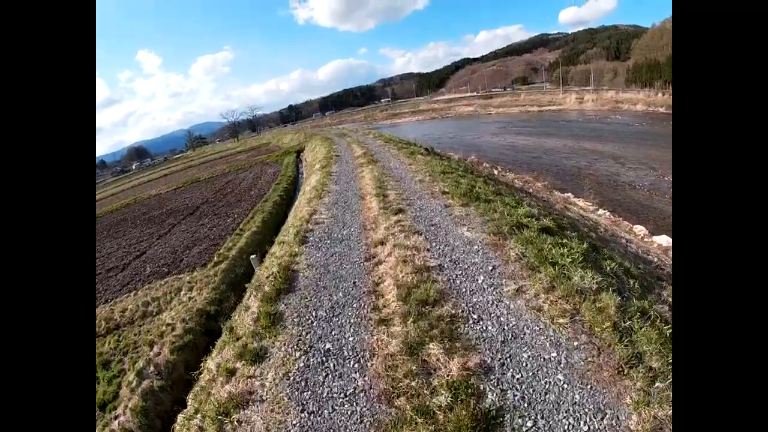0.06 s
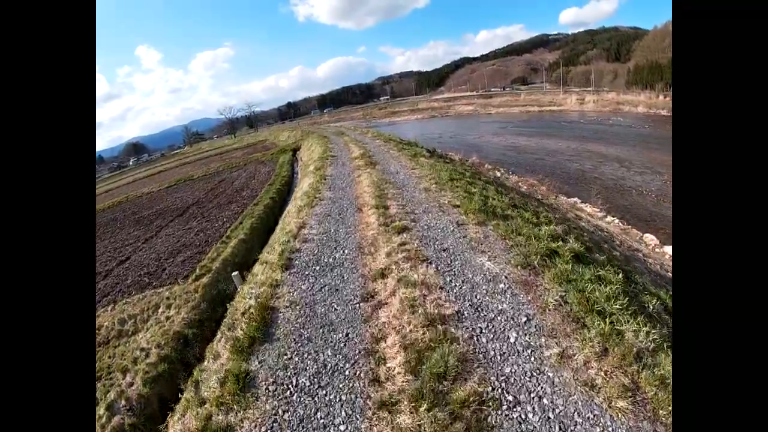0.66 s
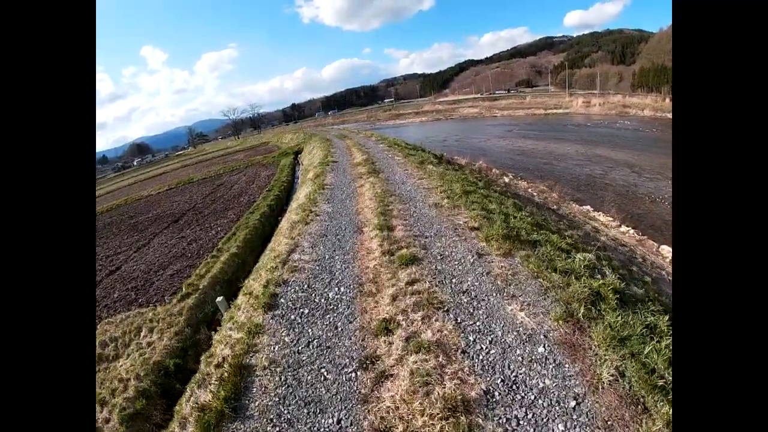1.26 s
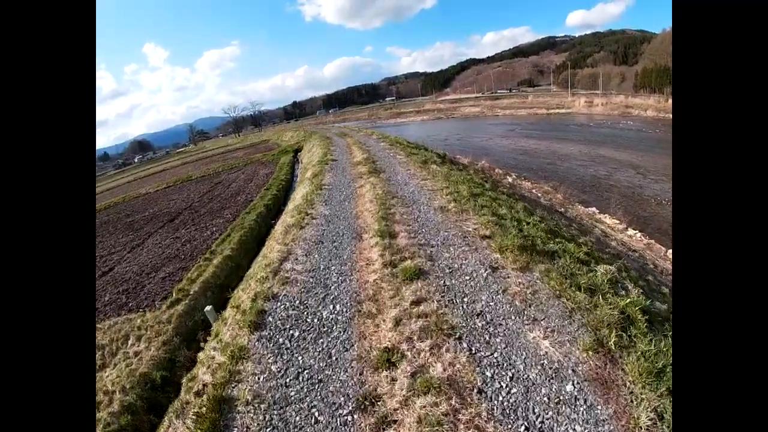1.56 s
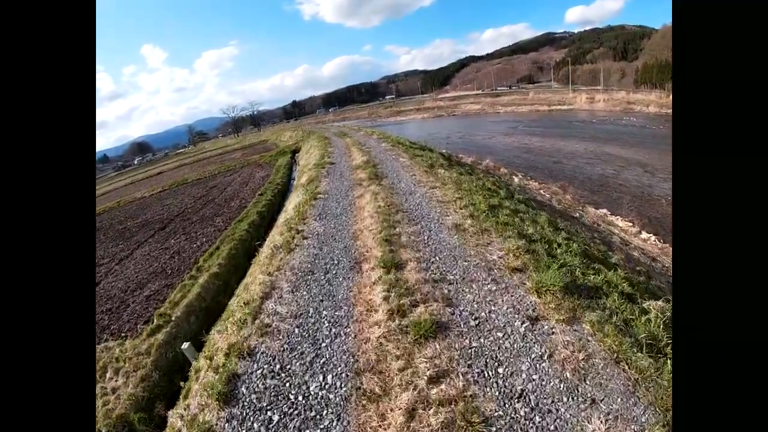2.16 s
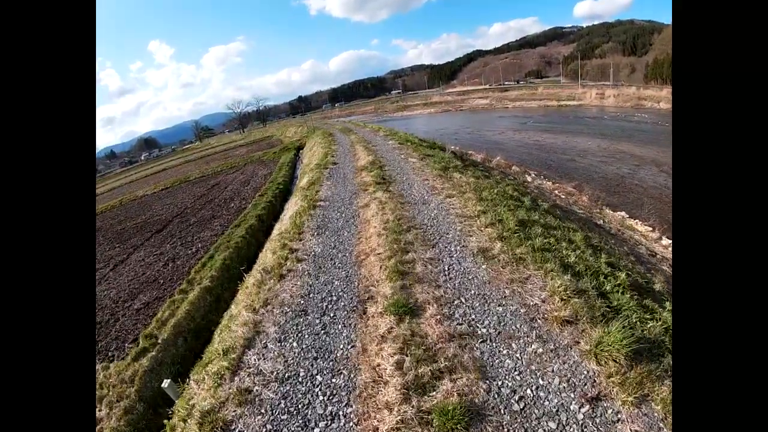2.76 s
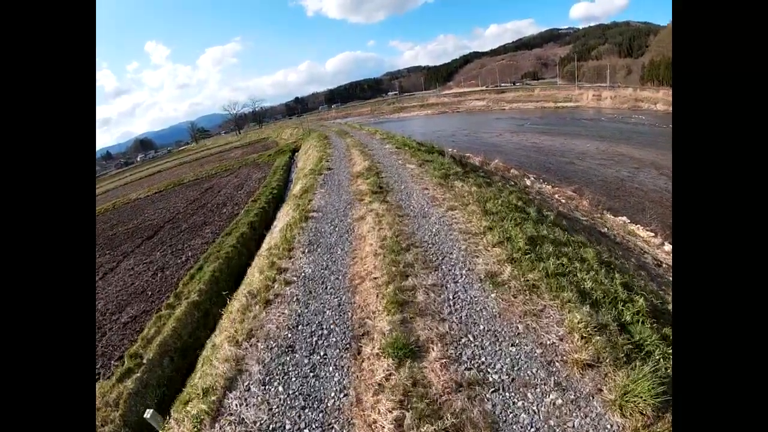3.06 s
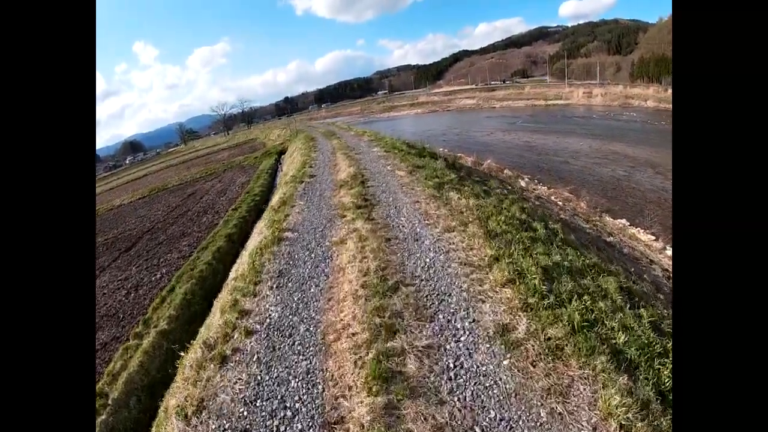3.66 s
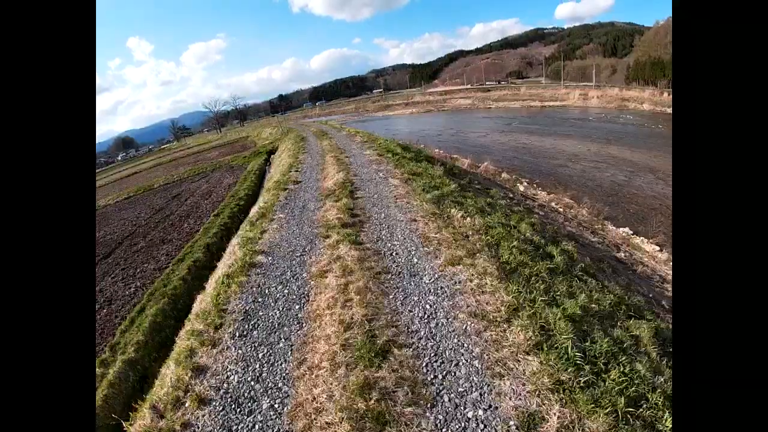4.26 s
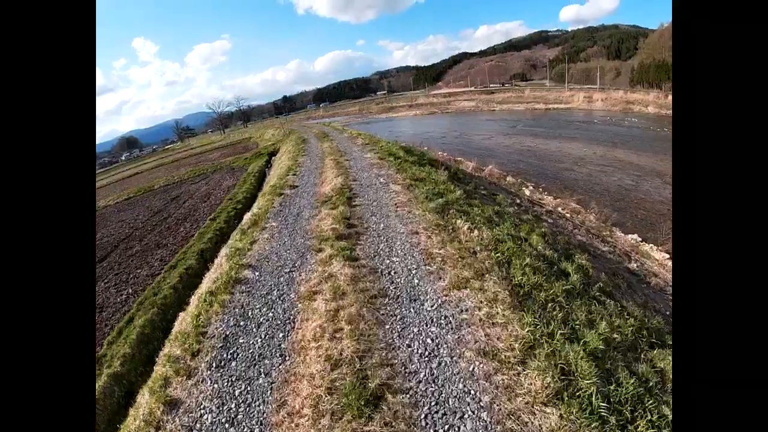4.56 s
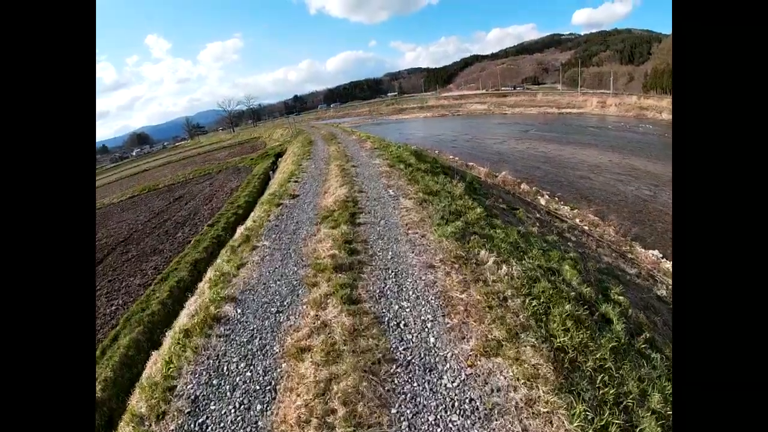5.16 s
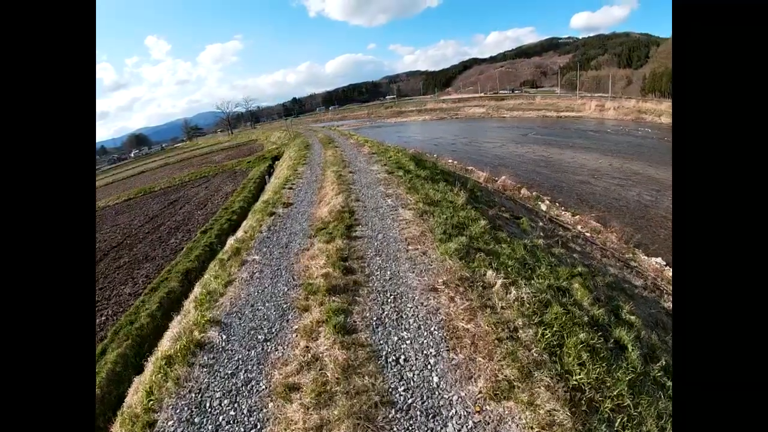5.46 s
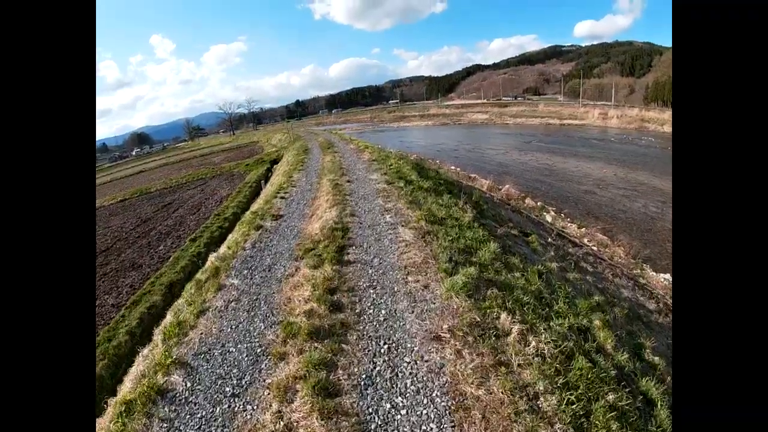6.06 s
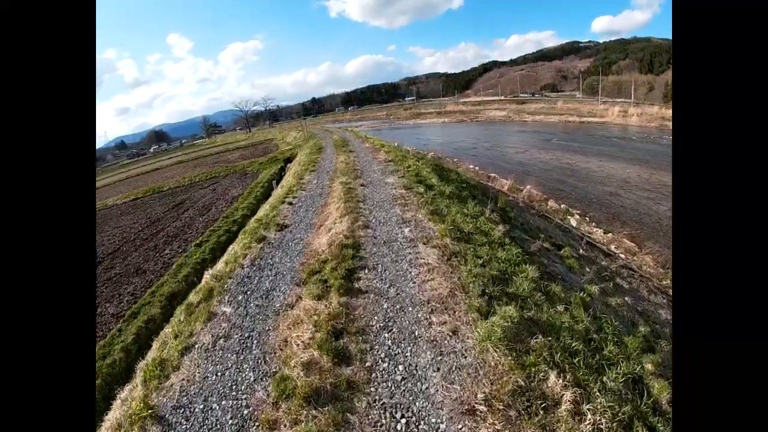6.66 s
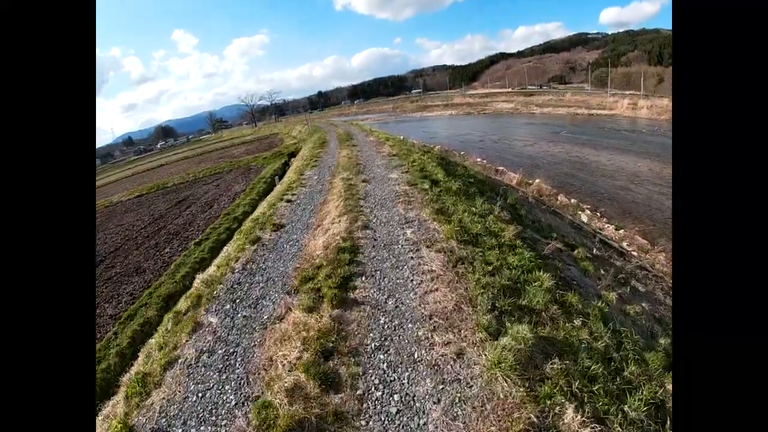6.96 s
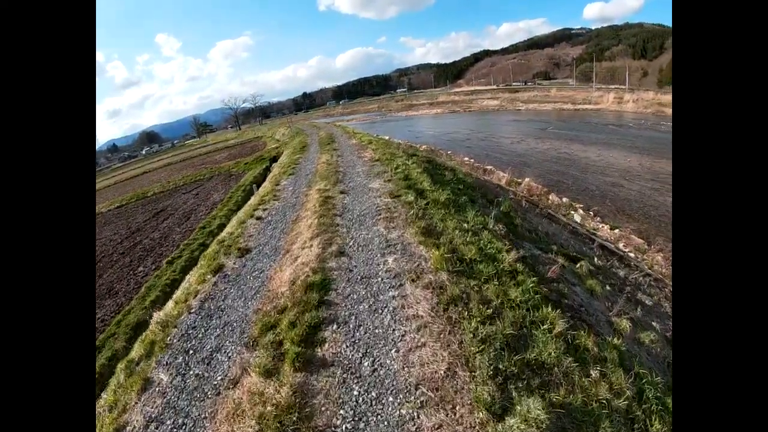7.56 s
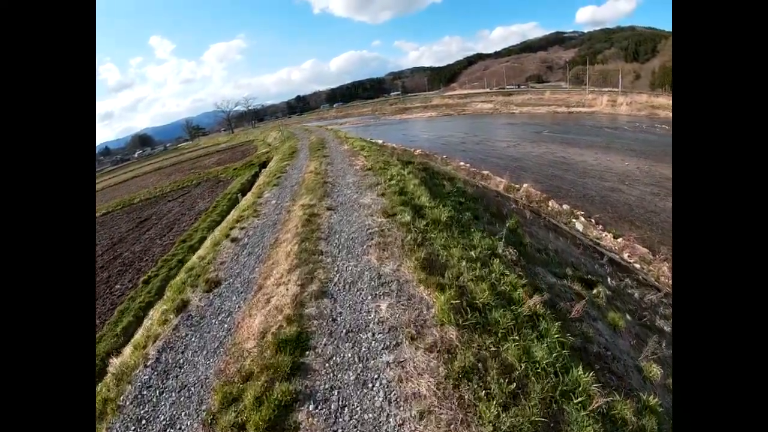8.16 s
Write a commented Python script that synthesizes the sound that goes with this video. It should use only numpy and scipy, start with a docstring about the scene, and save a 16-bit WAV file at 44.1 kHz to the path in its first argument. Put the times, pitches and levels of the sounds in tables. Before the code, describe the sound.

Wind buffets the microphone over a steady rush of air, with faint footsteps crunching on gravel underneath.

```python
"""Wind buffets a small hand-held microphone, hardest in the first second, over a steady rush of air.
Under it, someone walks a gravel track between open fields: sandy scuffs, then soft crunches about
every 0.6 s that fade. Eddies heave the diaphragm; the wind puffs, and hums low once near 6.2 s.
Each sole grinds many tiny stones; larger ones scrape and squeak, and single pebbles click."""
import sys
import numpy as np
from scipy.fft import rfft, irfft, next_fast_len
from scipy.io import wavfile
from scipy.ndimage import uniform_filter1d, map_coordinates

SR = 44100
rng = np.random.default_rng(int(sys.argv[2]) if len(sys.argv) > 2 else 0)


def log_audio(samples):
    """Write samples as a 16-bit WAV file to the path given in sys.argv[1]."""
    # one column per channel
    frames = np.atleast_2d(samples).T
    # limit to full scale, then quantise
    limited = np.clip(frames, -1, 1)
    pcm = np.round(limited * 32767).astype(np.int16)
    wavfile.write(sys.argv[1], SR, pcm)


N = 370881

# footfalls on gravel: landing_s, roll_s, relative_level_db, heel_to_toe_growth_db, fine_grit_lift_db
FOOTFALLS = [(1.171, .14, -77, 1.5, 0), (1.677, 0.24, -72.5, 3.5, 5.5), (2.3, .18, -70, -2, 5),
             (2.86, .2, -72, 2, -3), (3.39, .24, -74, 3, 3), (4.106, .14, -72, 3.5, 5.5),
             (4.722, .036, -77, -1, 3), (5.156, .22, -82, 0, -3), (5.862, .023, -84, 0, -1),
             (6.605, .045, -79.5, 0, -4), (7.205, .07, -78.5, 1, -2), (7.892, .08, -83, -6, 2),
             (8.215, .24, -88, 3, 0)]
# the rush of open air: time_s, relative_level_db, low_body_lift_db
OPEN_AIR = [(0, -52, -1), (.2, -53, -5), (.65, -56, 0.5), (.95, -60, 3.5), (1.15, -58.5, 6.5),
            (1.35, -54, 2.5), (1.8, -51, 4), (2.2, -49.5, -10.5), (2.5, -50, -1), (2.85, -49, -16),
            (3.25, -50, -5), (3.5, -49.5, -1.5), (4.05, -49.5, -7), (4.3, -49.5, -.5), (4.75, -49.5, -1.5),
            (5.7, -50, 0.5), (6.55, -48, -1), (7, -49, -2), (7.7, -48, 0), (8.41, -47.5, -3)]


def amp(db):
    """Decibels to gain."""
    return 10 ** (np.asarray(db) / 20)


def unit(x):
    """x at rms 1."""
    return x / np.sqrt(np.mean(x ** 2) + 1e-20)


def clock():
    """The time of each sample in seconds."""
    return np.arange(N) / SR


def bell(t, peak_s, half_s):
    """A Gaussian swell of height 1; its half length is one standard deviation."""
    return np.exp(-.5 * ((t - peak_s) / half_s) ** 2)


def curves(rows):
    """One value per sample for each column after the time."""
    times, *columns = np.transpose(rows)
    return [np.interp(clock(), times, column) for column in columns]


def wobble(rate):
    """A smooth random curve, rate knots a second."""
    return map_coordinates(rng.standard_normal(int(N * rate / SR) + 4), [clock() * rate])


def filtered(x, response):
    """x through a gain that depends on frequency."""
    size = next_fast_len(N + 8192)
    return irfft(rfft(x, size) * response(np.fft.rfftfreq(size, 1 / SR)), size)[:N]


def coloured(x, spectrum):
    """x through an EQ curve of (frequency_hz, gain_db) points, at rms 1."""
    points_hz, db = np.transpose(spectrum)
    return unit(filtered(x, lambda hz: amp(np.interp(np.log(hz + 1), np.log(points_hz), db))))


def eddies(spectrum, span_s):
    """Turbulent pressure whose strength is evened out over span_s."""
    pressure = coloured(rng.standard_normal(N), spectrum)
    width = max(int(span_s * SR), 64)
    power = uniform_filter1d(uniform_filter1d(pressure ** 2, width), width)
    return unit(pressure / np.sqrt(np.abs(power) + .02))


def grains(per_second, spread_db):
    """Tiny contacts at random moments, a few larger than the rest."""
    hits = rng.random(N) < per_second / SR
    size = np.minimum(rng.exponential(size=N), 3)
    return unit(hits * rng.choice([-1, 1], N) * amp(spread_db * size))


def burst(source, peak_s, db, half_s, centre_hz, sharpness):
    """One swell of a source through a steep-sided resonance."""
    size = next_fast_len(int(8 * max(half_s, .002) * SR) + 2048)
    start = int(np.clip(round(peak_s * SR) - size // 2, 0, N - size))
    hz = np.fft.rfftfreq(size, 1 / SR) + 1
    band = 1 / (1 + (sharpness * (hz / centre_hz - centre_hz / hz)) ** 2 / 2) ** 2
    puff = unit(irfft(rfft(source[start:start + size]) * band, size))
    swell = bell((start + np.arange(size)) / SR, peak_s, half_s)
    return np.pad(amp(db) * swell * puff, (start, N - size - start))


def buffeting():
    """Large eddies heave the diaphragm, smaller ones flutter on top, and single ones thump the port."""
    # strength of the wind on the port: time_s, relative_level_db
    wind_strength = [(0, -24), (.25, -28.5), (.35, -27.5), (.52, -21.5), (.8, -27), (.92, -32.5),
                     (1.35, -30.5), (1.85, -32.5), (2.03, -26), (2.42, -23.5), (2.63, -30.5), (3.25, -34),
                     (4.6, -32.5), (5.3, -33), (5.88, -37.5), (6.65, -36), (7.1, -38), (7.95, -34),
                     (8.41, -42.5)]
    # the wind drops away: time_s, half_length_s, depth_db
    lulls = [(1.066, 0.023, 6.5), (1.277, 0.051, 6.5), (2.67, 0.013, 2.5), (3.246, 0.032, 1),
             (3.608, .02, 0.5), (5.043, 0.017, 8), (5.496, 0.031, 3), (5.724, 0.043, 3.5),
             (5.936, 0.026, 3), (6.133, 0.042, 7.5), (6.37, 0.032, 3), (6.865, 0.057, 4.5),
             (7.325, 0.035, 3.5), (7.65, 0.044, 3.5), (8.34, .04, 5)]
    # single eddies: peak_s, half_length_s, heave_db, flutter_db, fine_share (0-1)
    buffets = [(0.091, 0.018, -37, -22.5, 0.24), (0.18, 0.026, -24.5, -16.5, 0.35),
               (0.239, 0.027, -18, -22.5, 0.42), (0.565, 0.024, -26, -15, 0.11),
               (0.675, 0.031, -21.5, -19, 0.21), (0.778, 0.021, -13.5, -17, 0.63),
               (0.84, 0.013, -32, -18.5, 0.48), (1.003, 0.016, -24.5, -33, 0.08),
               (1.115, 0.025, -42, -32, 0.18), (1.178, 0.018, -28, -28, 0.1), (2.03, 0.031, -24, -30, 0.77),
               (2.224, .019, -23, -30, 0.5), (2.356, 0.032, -28, -32.5, 0.74), (2.45, 0.016, -25, -21, 1),
               (2.745, .019, -40, -29.5, 0.26), (2.796, 0.012, -23, -43, .2),
               (2.939, 0.017, -31, -33, 0.95), (3.051, 0.024, -23, -53, .2), (3.474, 0.047, -25, -43, 0.15),
               (3.675, 0.016, -24, -32.5, 0.4), (3.799, 0.017, -20, -27, .35), (3.86, 0.017, -20, -30, .2),
               (3.913, .012, -24, -37, 0.07), (4.037, 0.019, -23, -45, .2), (4.122, 0.019, -23.5, -39, .2),
               (4.235, 0.02, -23.5, -40, 0), (4.397, .022, -24.5, -49, .2), (4.59, 0.014, -25.5, -44, .2),
               (4.83, 0.016, -30, -54, 0.05), (5.107, 0.012, -27, -34, 0.24), (5.16, 0.013, -34, -33, 0.8),
               (5.217, 0.011, -31, -35.5, .6), (5.31, 0.0073, -23.5, -51, .1),
               (6.451, 0.011, -39, -30, 0.92), (6.757, 0.02, -32.5, -34, 0.72),
               (6.981, 0.016, -21, -31, 0.87), (7.214, 0.02, -29, -43, .3), (7.585, 0.013, -46, -36.5, 1),
               (7.811, 0.0086, -31, -31, 0.3), (8.24, 0.023, -32, -39, 0.7)]
    # deep rumble of the large eddies: frequency_hz, gain_db
    heave_eq = [(10, -10), (22, 4.5), (45, 4.5), (80, 0.5), (115, -7), (160, -19), (300, -57.5),
                (800, -79.5), (16000, -130)]
    # flutter of the smaller eddies: frequency_hz, gain_db
    flutter_eq = [(60, -9.5), (110, -5.5), (150, 2.5), (205, -6), (280, -15.5), (450, -29.5), (900, -58),
                  (3000, -83), (16000, -120)]
    t = clock()
    dips_db = sum(depth_db * bell(t, s, half_s) for s, half_s, depth_db in lulls)
    wind_db = curves(wind_strength)[0] + 1.36 * wobble(12) - dips_db
    heave_power = amp(wind_db + 1 + 1.2 * wobble(22)) ** 2
    flutter_gain = amp(wind_db - 9.5 + 3.73 * wobble(24))
    flutter_gain *= amp(-2.5 * np.maximum(wobble(9), 0))  # it dips between eddies
    coarse_power, fine_power = np.zeros((2, N))
    for s, half_s, heave_db, flutter_db, fine_share in buffets:
        near = slice(max(int((s - 4 * half_s) * SR), 0), int((s + 4 * half_s) * SR))
        swell = bell(t[near], s, half_s) ** 2
        heave_power[near] += amp(heave_db) ** 2 * swell
        coarse_power[near] += (1 - fine_share) * amp(flutter_db) ** 2 * swell
        fine_power[near] += fine_share * amp(flutter_db) ** 2 * swell
    thumps = np.zeros(N)
    for power, pitch_ratio in [(coarse_power, .77), (fine_power, 1.112)]:  # larger eddies sound lower
        thump_eq = [(hz * pitch_ratio, db) for hz, db in flutter_eq]
        thumps += np.sqrt(power) * eddies(thump_eq, span_s=.028)
    heave = np.sqrt(heave_power) * eddies(heave_eq, span_s=.1)
    flutter = flutter_gain * eddies(flutter_eq, span_s=.047)
    return heave + flutter + thumps


def wind_puffs_and_hum():
    """Short dull puffs of wind, and one long low wind hum near 6.2 s: swells of ragged noise."""
    # the puffs and the hum: peak_s, level_db, half_length_s, centre_hz
    swells = [(0.179, -36.5, 0.026, 378), (0.204, -31.5, 0.0027, 517), (0.253, -34, 0.017, 407),
              (0.51, -38.5, 0.016, 375), (0.56, -38, .003, 470), (0.576, -30, 0.013, 370),
              (0.692, -38.5, 0.068, 350), (0.776, -35.5, 0.0038, 680), (0.788, -22, 0.0063, 360),
              (0.826, -38, 0.014, 423), (1.641, -37, 0.012, 453), (1.704, -44, 0.016, 380),
              (1.89, -39.5, 0.023, 480), (2.017, -35.5, 0.021, 388), (2.048, -33, 0.0054, 616),
              (2.076, -40.5, 0.025, 624), (2.125, -45, .004, 620), (2.43, -41, 0.019, 470),
              (2.477, -35.5, 0.018, 706), (2.518, -43, 0.007, 620), (2.643, -44, .014, 680),
              (2.711, -39, 0.022, 645), (2.767, -44.5, 0.017, 580), (3.443, -45, 0.025, 500),
              (6.198, -45, 0.3, 180)]
    dull_eq = [(200, 3), (400, .5), (750, -9), (1200, -14), (2500, -13.5)]
    ragged = amp(1.8 * wobble(120))
    flow = ragged * coloured(rng.standard_normal(N), dull_eq)
    return sum(burst(flow, *swell, sharpness=1.05) for swell in swells)


def tread():
    """Relative level in dB of the grit underfoot: each step lands, rolls, lifts and leaves a trickle."""
    land_db_per_s, lift_db_per_s = 231.5, 189
    trickle_db, trickle_db_per_s = -9.5, 45.5
    t = clock()
    level = amp(-87.5)  # gravel settling between steps
    for s, roll_s, db, growth_db, _ in FOOTFALLS:
        attack_db = -land_db_per_s * np.maximum(s - t, 0)
        push_db = growth_db * (np.clip((t - s) / roll_s, 0, 1) - .5)
        lifted_s = np.maximum(t - s - roll_s, 0)
        release_db = np.maximum(-lift_db_per_s * lifted_s, trickle_db - trickle_db_per_s * lifted_s)
        level = np.hypot(level, amp(db + attack_db + push_db + release_db))
    return 20 * np.log10(level)


def footsteps():
    """Weight rolls over the sole and crunches small stones in clumps; under a firm step a few snap."""
    # crunch of gravel: frequency_hz, gain_db
    gravel_eq = [(900, -5.5), (2800, 13), (4700, 4), (5700, 10), (6800, -4), (9200, -2.5), (10300, -11),
                 (12300, -10), (13500, -13.5), (16000, -19.5)]
    snap_eq = [(1500, -14), (3500, 0), (6000, 0), (9000, -7), (13000, -16), (16000, -26)]
    fine_grit_hz = 11000
    tread_db = tread() + .9 * wobble(22)
    weight = np.clip((tread_db + 78) / 8, 0, 1)
    clumps = amp((1 + 1.2 * weight) * wobble(70))
    crunch = amp(tread_db + 11) * clumps * coloured(grains(per_second=8200, spread_db=2.5), gravel_eq)
    snaps = amp(tread_db - 8.5) * weight * coloured(grains(per_second=70, spread_db=3), snap_eq)
    # each patch of track has its own share of fine grit
    fine_grit = filtered(crunch, lambda hz: 1 / (1 + (fine_grit_hz / (hz + 1)) ** 12))
    bright_db, = curves([(s + roll_s / 2, lift_db) for s, roll_s, _, _, lift_db in FOOTFALLS])
    return crunch + snaps + (amp(bright_db) - 1) * fine_grit


def pebble_clicks():
    """A stone knocks its neighbour: a dry crack and four brief, inharmonic modes."""
    # single knocks: start_s, ring_db, pitch_hz, t60_s, crack_db
    knocks = [(.274, -52, 8250, .007, -65), (.283, -47, 7460, .007, -60), (.377, -56, 8900, .007, -65),
              (.394, -48, 7100, .008, -63), (.458, -51, 8700, .01, -63), (.576, -54, 5600, .006, -55),
              (.909, -59, 7500, .008, -67), (.967, -60, 7800, .008, -71), (2.158, -46, 4200, .009, -55),
              (2.184, -50, 4800, .008, -63), (2.4505, -33, 1600, .008, -40.5),
              (3.442, -38, 2000, .008, -46), (3.448, -46, 5400, .009, -56), (4.189, -45, 5300, 0.02, -58),
              (4.315, -37, 1650, .009, -42), (4.718, -43, 5500, .012, -54), (4.749, -38, 2000, .01, -43),
              (4.764, -44, 3000, .008, -49), (4.876, -47, 5530, .009, -66), (4.906, -65, 9200, .008, -76),
              (5.2285, -49, 5200, .008, -64), (5.342, -51, 4600, .008, -64), (5.357, -64, 7600, .008, -75),
              (5.528, -50, 4900, .008, -68), (5.592, -53, 5400, .008, -65), (5.735, -51, 5200, .008, -66),
              (5.854, -52, 5600, .008, -58), (5.855, -44, 2800, .008, -51), (5.901, -42, 2600, .008, -50),
              (5.9575, -36, 1900, .011, -46), (6.09, -52, 5400, .008, -65), (6.247, -50, 5500, .008, -66),
              (6.38, -46, 3900, .009, -59), (6.528, -50, 4800, .008, -64), (6.6033, -25.5, 614, 0.022, -35),
              (6.604, -35, 3500, .0078, -41), (6.6135, -33, 1750, .008, -40), (6.626, -59, 8000, .008, -68),
              (6.642, -38, 3600, .008, -50), (6.6455, -39, 3600, .008, -53), (6.662, -38, 1800, .009, -44),
              (6.705, -34, 1710, 0.0087, -42), (6.707, -39, 3400, .006, -47),
              (6.7405, -51, 4600, .008, -64), (7.1315, -50, 4600, .008, -62), (7.202, -38, 2600, .008, -46),
              (7.21, -57, 9200, .012, -70), (7.247, -38, 2000, .011, -45), (7.265, -44, 2400, .011, -45),
              (7.275, -38, 1700, .01, -46), (7.391, -51, 5600, .008, -62), (7.992, -38, 5360, .0044, -53),
              (8.237, -48, 5600, .008, -62)]
    # dry snap of a contact: frequency_hz, gain_db
    crack_eq = [(500, 7), (4000, 2.5), (6000, -3.5), (7000, -9.5), (9200, -7), (10500, -18.5), (12500, -15),
                (16000, -33)]
    modes = [(.45, .4), (.74, .34), (1, .9), (1.14, .15)]  # pitch_ratio, gain
    crack_half_s, attack_s = .00043, .00032
    top_hz = 10500  # the pebble's ring is dulled above this pitch
    t = np.arange(SR // 10) / SR
    rings, cracks = np.zeros(N + SR), np.zeros(N)
    noise = coloured(rng.standard_normal(N), crack_eq)
    for s, ring_db, pitch_hz, t60_s, crack_db in knocks:
        cracks += burst(noise, s + crack_half_s, crack_db, crack_half_s, pitch_hz, sharpness=.81)
        ring = sum(gain * np.sin(2 * np.pi * (pitch_hz * ratio * t + rng.random()))
                   for ratio, gain in modes)
        envelope = amp(ring_db - 60 * t / t60_s) * (1 - np.exp(-t / attack_s))
        start = round(s * SR)
        rings[start:start + len(t)] += envelope * ring
    return filtered(rings[:N], lambda hz: 1 / (1 + (hz / top_hz) ** 12)) + cracks


def stone_scrapes():
    """Larger stones slip under the sole, juddering as they catch and let go."""
    # slipping stones: peak_s, level_db, half_length_s, centre_hz
    slips = [(1.331, -51.5, 0.025, 2430), (1.875, -57, 0.027, 3200), (2.46, -46, 0.028, 1790),
             (2.93, -54, .03, 2500), (3.02, -49, 0.021, 3200), (3.445, -55, .012, 3600),
             (3.568, -50, .028, 2800), (3.72, -55, .04, 2300), (4.216, -55, .03, 2400),
             (4.719, -52, .003, 6500), (4.76, -47, .016, 2300), (4.87, -62, .04, 3200),
             (5.368, -47.5, 0.028, 1750), (5.93, -52, .038, 1900), (6.557, -54, .02, 2800),
             (6.64, -54, .05, 2200), (7.258, -47.5, .032, 2300), (7.975, -61, .018, 4800),
             (8.08, -60, .025, 4800), (8.28, -63, .06, 4500)]
    # rasp of the larger stones: frequency_hz, gain_db
    stone_eq = [(300, 31), (3800, -4), (4700, -10.5), (5800, -0.5), (6700, -26), (9000, -25.5),
                (11000, -27), (16000, -35.5)]
    judder = amp(2 * wobble(180))
    rasp = unit(judder * coloured(grains(per_second=1200, spread_db=3.5), stone_eq))
    return sum(burst(rasp, *slip, sharpness=.4) for slip in slips)


def stone_squeaks():
    """A pinched stone sticks and slips: a tiny, trembling chirp that rises as it gives way."""
    # squeaks under the sole: peak_s, level_db, half_length_s, pitch_hz
    chirps = [(1.332, -57, .006, 3250), (1.346, -53, .006, 2850), (2.43, -56, .008, 3250),
              (3.855, -43, .004, 1550), (4.239, -50, .004, 1620), (4.253, -46, 0.0044, 1920),
              (4.313, -48, .004, 1620), (7.977, -51, 0.0037, 3000)]
    rise_octaves_per_s = 9
    t, squeaks = clock(), np.zeros(N)
    tremble = 1 + .029 * wobble(700)
    for s, db, half_s, hz in chirps:
        near = np.abs(t - s) < .05
        pitch_hz = hz * 2 ** (rise_octaves_per_s * (t[near] - s)) * tremble[near]
        tone = np.sin(2 * np.pi * np.cumsum(pitch_hz) / SR)
        squeaks[near] += amp(db) * bell(t[near], s, half_s) * tone
    return squeaks


def sand_scuffs():
    """The sole slides over fine sand: each scuff swells, drags and falls; duller sand trickles between."""
    # close scuffs of the first steps: peak_s, level_db, rise_db_per_s, fall_db_per_s
    scuffs = [(.005, -58.5, 97, 142), (0.138, -53.5, 168, 227), (.615, -63.5, 200, 120),
              (.725, -59, 110, 230)]
    # bright hiss of sand under the sole: frequency_hz, gain_db
    scuff_eq = [(800, -14), (2000, -8.5), (4500, -3.5), (6500, 0), (8300, -1), (9500, -6), (11000, -15),
                (13000, -18), (16000, -52)]
    # duller hiss of loose sand: frequency_hz, gain_db
    trickle_eq = [(800, -8), (2500, 0), (4500, 2), (8300, -3.5), (9500, -15), (11000, -23.5), (16000, -48)]
    hold_s = .027  # a scuff holds its level this long on either side of the peak
    fade_start_s, fade_db_per_s = .72, 40
    t = clock()
    trickle_db = -64 - fade_db_per_s * np.maximum(t - fade_start_s, 0)
    trickle = amp(trickle_db) * coloured(grains(per_second=8700, spread_db=6), trickle_eq)
    level = np.zeros(N)
    for s, db, rise, fall in scuffs:
        attack_db = -rise * np.maximum(s - hold_s - t, 0)
        release_db = -fall * np.maximum(t - s - hold_s, 0)
        level = np.hypot(level, amp(db + attack_db + release_db))
    uneven = amp(.6 * wobble(36))
    slide = level * coloured(grains(per_second=11000, spread_db=5.5), scuff_eq)
    return uneven * (trickle + slide)


def stone_grind():
    """Coarse stones rub together under the sole, louder the firmer the step."""
    rub_eq = [(600, -12.5), (1500, 3), (3300, -4.5), (4600, -14), (6500, -26), (12000, -52)]
    firm_step_db = -70
    grind_db = -62 + .77 * (tread() - firm_step_db)
    return amp(grind_db) * coloured(grains(per_second=820, spread_db=2), rub_eq)


def grit_ticks():
    """Loose grit keeps ticking faintly, its level riding far below the rush of air."""
    tick_eq = [(1500, -16.5), (3500, 7), (5800, 3.5), (6800, -15.5), (9500, -25), (12000, -38)]
    rush_db, _ = curves(OPEN_AIR)
    return amp(rush_db - 24.5) * coloured(grains(per_second=120, spread_db=2.3), tick_eq)


def air_rush():
    """The broad rush of wind over the fields; its body and its hiss waver separately."""
    # wind over open ground: frequency_hz, gain_db
    rush_eq = [(60, -6), (250, 5.5), (420, 3.5), (700, -0.5), (1100, -3), (1900, -10.5), (2900, -15),
               (3800, -20.5), (4600, -29), (5800, -30), (6400, -41.5), (7000, -49), (10000, -59),
               (16000, -58)]
    crossover_hz = 650
    rush_db, body_db = curves(OPEN_AIR)
    rush = coloured(rng.standard_normal(N), rush_eq)
    lows = filtered(rush, lambda hz: 1 / (1 + (hz / crossover_hz) ** 4))
    body = amp(body_db + .86 * wobble(14)) * lows
    hiss = amp(.91 * wobble(25)) * (rush - lows)
    return amp(rush_db + 6) * (body + hiss)


def scene():
    """Wind in front, feet below, in mono."""
    wind = buffeting() + wind_puffs_and_hum() + air_rush()
    feet = sand_scuffs() + footsteps()
    stones = stone_scrapes() + stone_grind() + grit_ticks() + pebble_clicks() + stone_squeaks()
    return (wind + feet + stones)[None]


def record(dry):
    """The recorder keeps nothing above its band limit."""
    top_hz = 15750
    return filtered(dry[0], lambda hz: hz < top_hz)[None]


dry = scene()
out = record(dry)
log_audio(out)
```